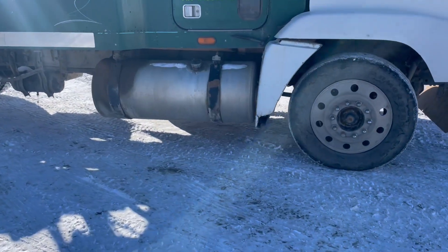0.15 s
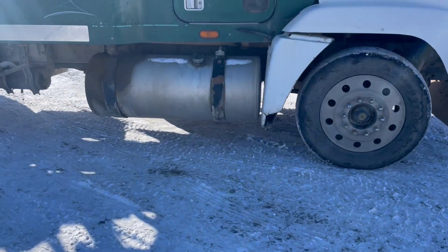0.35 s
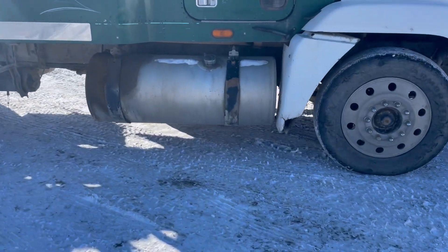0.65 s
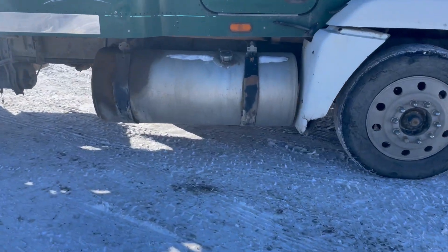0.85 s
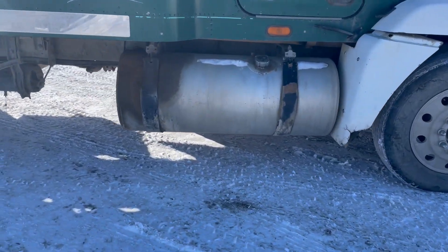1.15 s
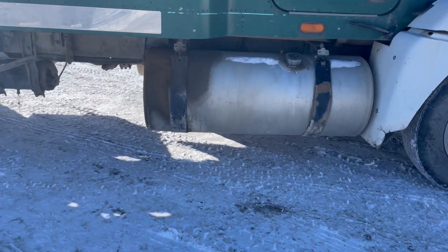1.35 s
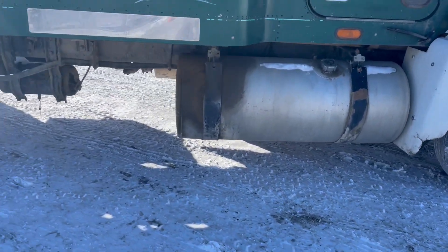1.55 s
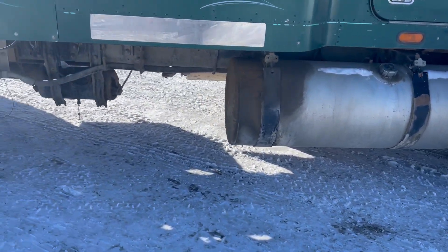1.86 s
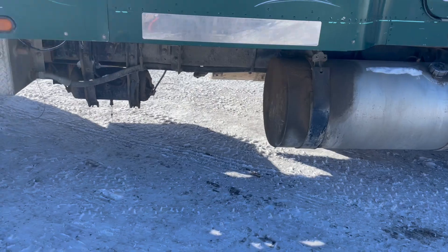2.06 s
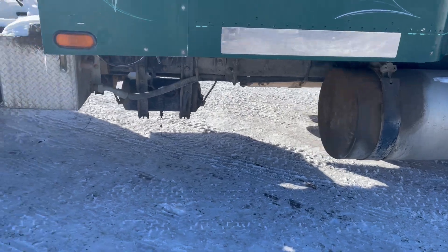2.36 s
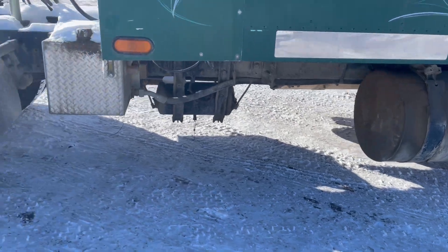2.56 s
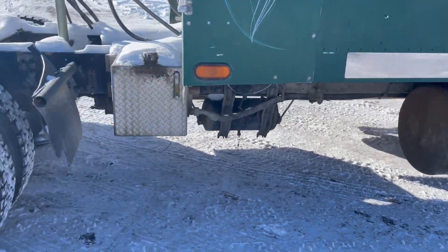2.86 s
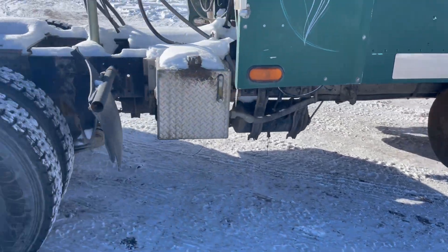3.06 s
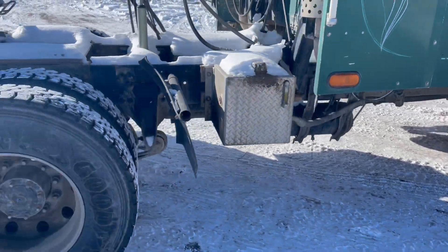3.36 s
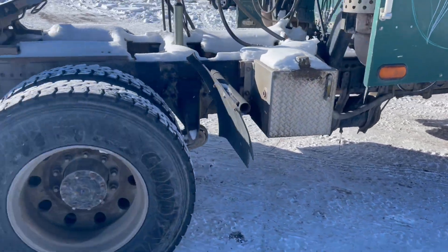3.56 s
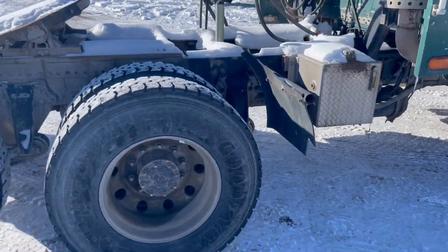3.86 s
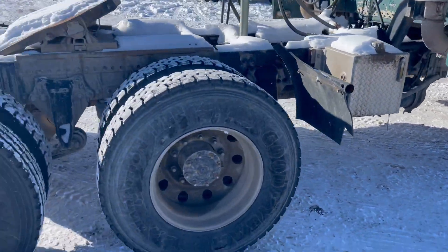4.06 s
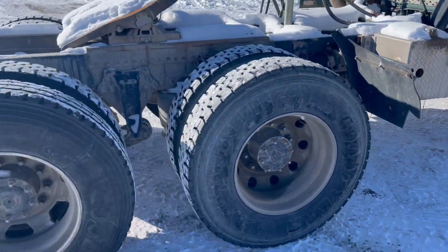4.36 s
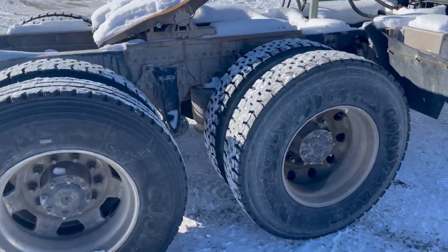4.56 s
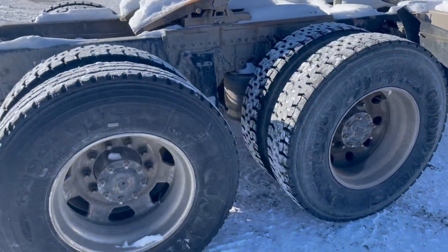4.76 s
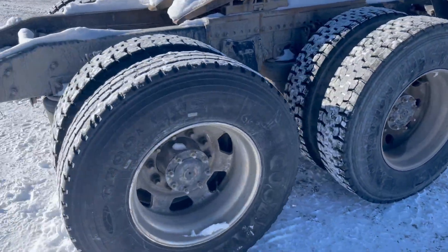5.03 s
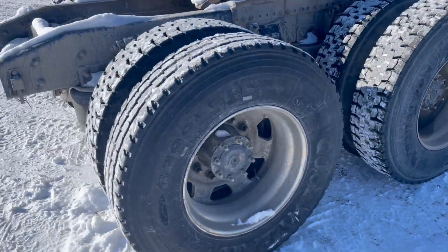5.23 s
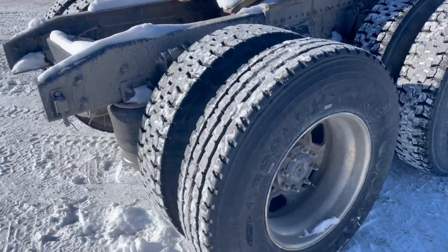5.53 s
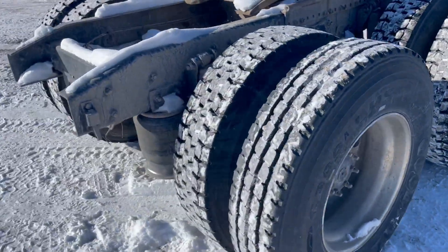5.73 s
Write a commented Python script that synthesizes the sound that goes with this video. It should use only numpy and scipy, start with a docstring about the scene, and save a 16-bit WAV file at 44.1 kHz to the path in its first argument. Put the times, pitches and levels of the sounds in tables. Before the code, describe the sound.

A large diesel truck in an open snowy yard, heard close from a hand-held stereo microphone moving along its side. A short rev with knocking and small metal ticks falls to a lumpy idle, where a thin gear whine and a descending turbo whistle come forward. Then two hard revs follow almost without a gap, with droning exhaust and dense metallic clatter. Wind thumps the microphone throughout.

```python
"""A six-cylinder diesel truck in a snowy open yard, heard by a hand-held two-port microphone walking along it.
First a blip: firing-gated noise roars and knocks, short metallic rings sound, turbo tones start a long slide down.
Then it coasts to idle: the gear whine, a tone tied to the firing rate, comes forward and the turbo dies out.
Last come two pulls, with hardly a drop between: exhaust orders drone amid a dense run of metallic rings.
Wind buffets the ports throughout: rumble and flutter of filtered noise, and eddies as short falling sines."""
import sys
import numpy as np
from scipy import signal
from scipy.fft import rfft, irfft
from scipy.io import wavfile
from scipy.ndimage import uniform_filter1d, map_coordinates

SR = 44100
rng = np.random.default_rng(int(sys.argv[2]) if len(sys.argv) > 2 else 0)


def log_audio(samples):
    """Write samples as a 16-bit WAV file to the path given in sys.argv[1]."""
    # one column per channel
    frames = np.atleast_2d(samples).T
    # limit to full scale, then quantise
    limited = np.clip(frames, -1, 1)
    pcm = np.round(limited * 32767).astype(np.int16)
    wavfile.write(sys.argv[1], SR, pcm)


def ratio(d):
    """dB to gain"""
    e = np.asarray(d, float) / 20
    return 10 ** e


N = 259749
HZ = np.arange(N // 2 + 1) * SR / N + 1e-3   # frequency of every spectrum bin


def in_time(rows):
    """Columns of a time table, interpolated at every sample."""
    s, *columns = np.transpose(rows)
    return [np.interp(np.arange(N) / SR, s, c) for c in columns]


def at_hz(points):
    """A spectrum table at every bin, interpolated over log frequency."""
    hz, value = np.transpose(points)
    return np.interp(np.log(HZ), np.log(hz + 1), value)


def rms_one(x):
    """Scaled to unit power."""
    return x / np.sqrt(np.mean(x ** 2) + 1e-20)


def drift(rate_hz):
    """Random wander of spread 1: noise rolled off above rate_hz."""
    return rms_one(irfft(rfft(rng.standard_normal(N)) / (1 + (HZ / rate_hz) ** 2), N))


def coloured(source, gain):
    """Filtered by a gain per bin, then scaled to unit power."""
    return rms_one(irfft(rfft(source) * gain, N))


def tone(hz, waver_db):
    """A sine of rms 1 on a pitch curve, its level then wavering by waver_db."""
    cycles = np.cumsum(hz) / SR + rng.random()
    return np.sqrt(2) * np.sin(2 * np.pi * cycles) * ratio(waver_db * drift(9))


def shared_only(x):
    """Rows are the part common to both ports and the diffuse part; here the diffuse part is silent."""
    return np.array([x, np.zeros(N)])


# engine speed through blip, coast to idle and two pulls: (time [s], firing rate [1/s])
SPEED = [(0, 44.44), (.28, 40.29), (.56, 46.18), (.7, 47.13), (1.26, 38.18), (1.68, 32.6), (1.77, 31.5),
         (1.9, 32.1), (2.4, 32.22), (3.36, 32.17), (3.5, 32.04), (3.64, 32.47), (3.78, 35.0), (3.92, 37.5),
         (4.18, 41.8), (4.35, 49.14), (4.45, 53.3), (4.66, 66.17), (4.74, 69.4), (4.8, 73.3), (4.97, 71.96),
         (5.2, 74.25), (5.29, 74.7), (5.5, 66.1), (5.89, 62)]


def firing_rate():
    """Firings per second at every sample."""
    return in_time(SPEED)[0]


# strength of each of the six cylinders in turn: (level [dB])
CYLINDER_DB = [3.5, -3, -2.5, 2.5, -3, -2]


def firing_noise(per_s, depth, scatter_db, repeat=0., spread_s=0.024):
    """Each firing swells the noise in the walls, stronger in some cylinders; spread_s is the 1/e decay."""
    turns = np.cumsum(per_s) / SR + .3
    firing = turns.astype(int)
    bump = np.sin(np.pi * (turns - firing) ** 0.7) ** 4      # swells fast, dies slower
    struck = np.diff((turns + .6).astype(int), prepend=0)    # near the top of each swell
    scatter = scatter_db * rng.standard_normal(400)[firing]
    strength = ratio(np.array(CYLINDER_DB)[firing % 6] + scatter)
    noise = rng.standard_normal((2, N)) * (1 + depth * strength * bump)
    # the same parts answer every firing alike, which draws faint lines at the firing rate
    answer = rng.standard_normal((2, 2048)) * np.exp(-np.arange(2048) / (spread_s * SR))
    alike = irfft(rfft(struck * strength) * rfft(answer, N), N)
    return rms_one(noise) + repeat * rms_one(alike)


# block noise as load rises and the listener walks: (time [s], body [dB], knock [dB], hiss [dB])
LOAD = [(0, -34.5, -39.5, -51.5), (.27, -33.5, -38, -51), (.32, -27, -37, -46), (.44, -24.5, -33.5, -41.5),
        (.6, -24.5, -34, -45.5), (.66, -32.5, -36.5, -47.5), (1.65, -32.5, -42.5, -52.5),
        (1.8, -28.5, -40.5, -52), (2.47, -30.5, -42, -52), (3.3, -28.5, -41.5, -53.5),
        (3.6, -30.5, -40, -54), (3.71, -26.5, -36, -50), (3.75, -24, -30.5, -44.5), (3.92, -24.5, -34, -47),
        (3.97, -31, -34, -51), (4.17, -25.5, -30, -50.5), (4.218, -22, -25, -36.5),
        (4.42, -18.5, -24.5, -33), (4.65, -19.5, -23, -30.5), (4.818, -22.5, -24, -36),
        (4.87, -28, -29.5, -44.5), (5.02, -29, -33, -38), (5.1, -22, -31, -40.5), (5.24, -29.5, -28.5, -45),
        (5.32, -31.5, -30.5, -38), (5.7, -30, -31, -39), (5.88, -27, -30, -39)]
# load at which each layer's offset holds: (body [dB], knock [dB], hiss [dB])
LOUD_DB = -26, -32, -43
FLICKER_HZ = 18


def layer_db(mix):
    """Level of one layer: its shares of the load curves, a flicker of its own and the walk."""
    offset_db, *shares, flicker_db, walk_db_per_s = mix
    load_db = sum(share * (db - loud) for share, db, loud in zip(shares, in_time(LOAD), LOUD_DB))
    flicker = flicker_db * drift(FLICKER_HZ)
    return offset_db + load_db + flicker - walk_db_per_s * np.arange(N) / SR


# the upper edge of the airy treble sinks in the loud pulls: (time [s], edge [Hz])
TREBLE_EDGE = [(0, 13700), (3.9, 13280), (4.2, 11700), (4.9, 11400), (5.2, 11800), (5.5, 12300),
               (5.88, 12400)]
TREBLE_EDGE_DB, TREBLE_EDGE_HZ = -12, 300   # loss above the edge, width over which it sets in


def edge_dulled(x):
    """Narrow slices of the treble drop once the edge has sunk below them."""
    edge_hz, = in_time(TREBLE_EDGE)
    spectrum = rfft(x)
    out = x
    for low in np.arange(11400, 13900, 300):
        part = irfft(spectrum * ((HZ >= low) & (HZ < low + 300)), N)
        depth = np.clip((low - edge_hz) / TREBLE_EDGE_HZ + 1, 0, 1)
        out = out + part * (ratio(TREBLE_EDGE_DB * depth) - 1)
    return out


# colour of each layer of the block: (frequency [Hz], relative level per Hz [dB])
ROAR = [(150, -21), (250, -5.5), (280, -6), (311, -15.5), (340, 0.5), (368, -6), (425, -0.5), (475, -3),
        (515, -0.5), (550, -3), (595, 0.5), (650, -2), (760, -6), (854, -4), (898, -6), (950, -5),
        (1240, -22.5), (2090, -120)]
RATTLE = [(530, -25), (900, -7.5), (962, -10.5), (1040, 2), (1270, -2), (1370, -6), (1490, -1),
          (1610, -6.5), (1750, -5.5), (2280, -18), (3850, -120)]
KNOCK = [(1000, -2.5), (1700, -3.5), (2420, -1.5), (2980, -3.5), (3470, -7.5), (3930, -8.5), (4500, -13),
         (5850, -59), (9900, -120)]
HISS = [(3500, -26), (4300, 1), (5000, 4), (6000, -1), (7000, -1), (7550, 1), (8300, -6), (9000, -11),
        (9800, -41)]
AIR = [(8300, -4), (8900, 6.5), (10500, 0.5), (12000, -4.5), (13200, 0), (15600, 0), (16200, -50)]
# layer mixes: (offset [dB], body share, knock share, hiss share, flicker [dB], loss on the walk [dB/s])
ROAR_MIX = (2, 1.06, 0., 0., 1.35, 0.02)
RATTLE_MIX = (-1.5, 0.53, 0.17, 0.026, 0.67, 0.2)
KNOCK_MIX = (0.14, 0.2, 0.3, 0.48, 0.97, 0.022)
HISS_MIX = (0, 0., 0., 1., 1., 0.)
AIR_MIX = (0.5, 0.19, -0.11, 0.85, 1.6, 1.45)
# the rattle is screened as the listener leaves the engine bay: (time [s], gain [dB])
RATTLE_HEARD = [(0, 2), (1.2, 2.5), (1.8, 0), (3.5, -2.5), (4.5, -3), (5.0, -8.5), (5.88, -7.5)]
# evenness of the firings: (scatter between firings [dB], level of the repeating answer [ratio])
EVEN = 1.2, .6


def block(per_s):
    """The engine walls turn each firing into roar, rattle, knock, hiss and airy treble."""
    body_db, knock_db, hiss_db = LOUD_DB
    roar = coloured(firing_noise(per_s, 0.18, *EVEN, spread_s=0.23), ratio(at_hz(ROAR)))
    rattle = coloured(firing_noise(per_s, 0.17, *EVEN, spread_s=0.031), ratio(at_hz(RATTLE)))
    knock = coloured(firing_noise(per_s, 0.026, *EVEN, spread_s=0.33), ratio(at_hz(KNOCK)))
    hiss = coloured(firing_noise(per_s, 0.35, EVEN[0]), ratio(at_hz(HISS)))
    air = edge_dulled(coloured(firing_noise(per_s, 0.61, EVEN[0]), ratio(at_hz(AIR))))
    out = ratio(body_db + layer_db(ROAR_MIX)) * roar
    out += ratio(body_db + layer_db(RATTLE_MIX) + in_time(RATTLE_HEARD)[0]) * rattle
    out += ratio(knock_db + layer_db(KNOCK_MIX)) * knock
    out += ratio(hiss_db + layer_db(HISS_MIX)) * hiss
    return out + ratio(hiss_db + layer_db(AIR_MIX)) * air


# bouts in which one panel changes level: (start [s], length [s], panel [index from 0], gain [dB])
BOUTS = [(0.31, 0.32, 2, 7.5), (3.733, 0.058, 2, 16), (3.79, 0.14, 2, 8.5), (4.7, 0.08, 2, 7),
         (5.45, 0.296, 3, 2.5), (3.766, 0.255, 0, 7), (4.4, 0.08, 0, 5), (4.55, 0.128, 1, 4.5),
         (4.5, .36, 3, -3), (4.754, 0.125, 0, 4.5), (5.074, 0.116, 1, 14), (5.203, 0.079, 0, 9.5),
         (5.3, 0.53, 1, 6), (4.92, 0.93, 3, 7.5), (4.6, .4, 3, 8.5), (4.8, 0.68, 1, 1.5), (6.5, 0.6, 0, 1)]
BOUT_EDGE_S = 0.015


def bouts_db(panel):
    """Gain of one panel, held for the length of each of its bouts."""
    t = np.arange(N) / SR
    gain_db = 0
    for s, length, k, db in BOUTS:
        if round(k) == panel:
            inside_s = np.minimum(t - s, s + length - t)
            gain_db = gain_db + db * np.clip(inside_s / BOUT_EDGE_S + .5, 0, 1)
    return gain_db


PANEL_WANDER, WANDER_HZ = .013, 4.0   # pitch spread as a share, rate


def wandering(x):
    """Read at an unsteady pace, so that every resonance slides up and down."""
    at = np.cumsum(1 + PANEL_WANDER * drift(WANDER_HZ))
    at = np.clip(at - np.linspace(0, at[-1] - N, N), 0, N - 1)
    return np.array([map_coordinates(row, [at], order=2) for row in x])


# resonances of four wall panels, one list each: (frequency [Hz], width [Hz], relative level [dB])
WALL_MODES = [
    [(1950, 100, -4.5), (2130, 130, -6.5)],
    [(2650, 140, -22), (2650, 500, -16)],
    [(3380, 710, 6), (3630, 110, 1)],
    [(1009, 20, 7.5), (1100.5, 22, 4), (1302, 41, 0.5), (1500, 50, -9)],
]
# one mix per panel: (offset [dB], body share, knock share, hiss share, flicker [dB], loss on the walk [dB/s])
PANEL_MIX = [(-6, 0., 1.16, 0., 1.9, 0.63), (-15.5, 0., 1.5, 0.5, 2.5, 0.072),
             (-15.5, 0.0041, 0.51, 0.41, 2.6, 0.67), (-22.5, 0.014, 0.31, 0.076, 3.3, -1.9)]


def panels(per_s):
    """Firings excite the resonances of four panels, which ring out in bouts."""
    out = np.zeros((2, N))
    for k, (modes, mix) in enumerate(zip(WALL_MODES, PANEL_MIX)):
        gain = sum(ratio(db) / (1 + (2 * (HZ - hz) / width_hz) ** 2) ** 1.14 for hz, width_hz, db in modes)
        ring = coloured(firing_noise(per_s, 1.0, 1.5, repeat=.8, spread_s=.008), gain)
        out += ratio(LOUD_DB[1] + layer_db(mix) + bouts_db(k)) * wandering(ring)
    return out


# metallic knocks, and three brief swells of the gear side tone near 590 Hz:
# (time [s], ring level [dB], ring pitch [Hz])
RINGS = [(0.2859, -44, 3240), (0.2933, -40, 3120), (0.3078, -39, 3480), (0.3323, -30, 3380),
         (0.3607, -30, 3470), (0.3911, -30, 3610), (0.4131, -35, 3450), (0.426, -37, 3660),
         (0.448, -35, 3380), (0.4739, -39, 3420), (0.4964, -43, 3340), (0.5238, -34, 3470),
         (0.5333, -34, 3310), (0.5438, -30, 3310), (0.5592, -29, 3650), (0.6026, -27, 3250),
         (2.153, -17.5, 588), (2.34, -22.5, 600), (3.42, -23, 600), (3.738, -33, 3600), (3.768, -28, 3450),
         (4.4503, -30, 1500), (4.5027, -26, 1440), (4.5511, -23, 1460), (4.59, -20, 1460),
         (4.6344, -27, 1430), (4.6539, -30, 1530), (4.7104, -22, 1513), (4.7492, -18, 1500),
         (4.7701, -18, 1480), (4.2187, -20.5, 2570), (4.2432, -28, 2620), (4.2622, -20, 2350),
         (4.2876, -25, 2670), (4.3076, -22, 2640), (4.327, -19, 2640), (4.347, -15, 2610),
         (4.3679, -11.5, 2630), (4.4078, -10.5, 2700), (4.4268, -10, 2660), (4.4632, -21, 2650),
         (4.4927, -25, 2570), (4.5381, -29, 2500), (4.552, -22, 2740), (4.5879, -19, 2810),
         (4.6014, -22, 2530), (4.6193, -12, 2650), (4.6477, -12, 2675), (4.7221, -16, 2800),
         (4.7353, -17.5, 2650), (4.7621, -19.5, 2530), (4.8065, -15, 2700), (4.826, -16, 2200),
         (4.832, -19, 2600), (4.1978, -30, 1950), (4.2128, -32, 2060), (4.237, -14.5, 1904),
         (4.3385, -25, 1920), (4.3565, -16, 1930), (4.3773, -13, 1950), (4.4318, -21, 2140),
         (4.4697, -22, 2090), (4.5221, -22, 2070), (4.6239, -15, 1915), (4.6932, -25, 1900),
         (4.7386, -32, 1980), (4.7531, -21, 1950), (4.7705, -19, 2000), (4.8104, -20, 1950),
         (4.8394, -16, 2030), (5.0344, -28, 1860), (5.0658, -27, 2150), (5.0857, -19, 2040),
         (5.1262, -24, 2220), (5.1481, -20, 2070), (5.1606, -22, 2040), (5.1745, -21, 2140),
         (5.191, -25, 2060), (5.215, -20.5, 1890), (5.2299, -18, 1970), (5.2514, -23, 2130),
         (5.2833, -25, 2130)]
RING_RISE_S, RING_CYCLES = 0.00073, 122   # cycles until 60 dB down
RING_GRIT, RING_DIFFUSE = 0.34, 0.63      # roughness of the common part, level of the diffuse part
CRACK_DB, CRACK_S, CRACK_ABOVE_HZ = -11, .004, 3800   # level for a 3500 Hz ring, 1/e decay, low limit


def short_rings():
    """Each is a crack and a short gritty ring; part of it arrives scattered by the chassis."""
    out = np.zeros((2, N + SR))
    t = np.arange(SR // 10) / SR
    white = rng.standard_normal((len(RINGS), 2, len(t)))
    grit = uniform_filter1d(white, size=20) * np.sqrt(20)
    high_pass = signal.butter(2, CRACK_ABOVE_HZ, "high", fs=SR, output="sos")
    cracks = signal.sosfilt(high_pass, white) * np.exp(-t / CRACK_S)
    for (s, db, hz), rough, crack in zip(RINGS, grit, cracks):
        shape = np.tanh(t / RING_RISE_S) ** 2 * ratio(-60 * t * hz / RING_CYCLES)
        swing = [1 + RING_GRIT * rough[0], RING_DIFFUSE * rough[1]]
        ring = shape / shape.max() * swing * np.sin(2 * np.pi * hz * t)
        # higher rings open with a much stronger crack
        snap = ratio(CRACK_DB) * (3500 / hz) ** -4 * uniform_filter1d(crack, size=4)
        out[:, round(s * SR):][:, :len(t)] += ratio(db) * (ring + snap)
    return out[:, :N]


# exhaust drone, set by the fuel burnt: (time [s], first order ahead of the stack [dB])
DRONE = [(.2, -53), (.36, -34.5), (.55, -34), (.8, -34), (.95, -67), (3.55, -62), (3.72, -21), (3.9, -20),
         (4.18, -19.5), (4.45, -14), (4.66, -9), (4.8, -11), (4.97, -30.5), (5.05, -12.5), (5.2, -17),
         (5.3, -21), (5.4, -36), (5.55, -60)]
# firing orders one to four: (level [dB])
ORDERS_DB = [0, -2, -6, -4.5]
# what the stack passes: (frequency [Hz], gain [dB])
PIPE = [(30, -2.5), (76, -2.5), (90, -25), (135, -28), (148, 2), (165, 3), (215, -2), (235, -14),
        (300, -34)]
# upper orders: (multiple of the firing rate)
UPPER_ORDERS = [5, 5.5, 8.4, 8, 9.9]
PIPE_HZ, PIPE_WIDTH_HZ, PIPE_DB = 380, 80, -13   # upper resonance: centre, width, level


def exhaust(per_s):
    """Orders of the firing rate swell and sink as they cross the resonances of the stack."""
    drone_db, = in_time(DRONE)
    low = upper = 0
    for k, db in enumerate(ORDERS_DB, 1):
        stack_db = np.interp(k * per_s, *np.transpose(PIPE))
        low = low + ratio(db + stack_db) * tone(k * per_s, waver_db=0.8)
    for k in UPPER_ORDERS:
        off_centre = 2 * (k * per_s - PIPE_HZ) / PIPE_WIDTH_HZ
        upper = upper + tone(k * per_s, waver_db=5.0) / (1 + off_centre ** 2)
    return ratio(drone_db) * (low + ratio(PIPE_DB) * upper)


# gear whine, loudest while coasting: (time [s], whine [dB], side tones ahead of the casing [dB])
WHINE = [(0, -39, -38), (.26, -43, -38), (.32, -44, -43), (.62, -43, -42), (.7, -31, -38), (.79, -32, -38),
         (.85, -40, -38), (1.06, -43, -39), (1.09, -27, -35), (1.2, -30, -36), (1.28, -25, -39),
         (1.33, -27, -41), (1.38, -37, -45), (1.64, -38, -52), (1.72, -29, -51), (1.84, -27, -51),
         (1.95, -31, -52), (2.13, -33, -52), (2.25, -39, -50), (2.75, -40, -52), (2.83, -30, -53),
         (2.95, -32, -53), (3.1, -41, -53), (3.18, -34, -54), (3.27, -39, -54), (3.37, -34, -54),
         (3.43, -50, -52), (3.53, -48, -52), (3.6, -36, -50), (3.7, -46, -48), (4.06, -35, -45),
         (4.17, -29, -44), (4.3, -60, -60), (4.65, -48, -50), (4.8, -36, -40), (5.0, -41, -37),
         (5.1, -42, -44), (5.25, -40, -46), (5.4, -60, -60)]
# side tones: (multiple of the whine)
GEAR_PARTS = [1 / 3, 2 / 3, 4 / 3, 2]
# what the gear casing passes of the side tones: (frequency [Hz], gain [dB])
CASING = [(300, 0), (360, 3), (420, 1), (480, -4), (600, -7), (700, -14), (790, 2), (900, -14), (1300, -8),
          (1400, -22), (1500, 3), (1560, -5), (1640, -10), (1750, -22), (2100, -22), (2200, -6), (2290, -6),
          (2380, -5), (2500, -6), (2600, -2), (2800, -30), (3200, -50)]
WHINE_PER_FIRING = 27.5   # whine cycles per firing


def gear(per_s):
    """Meshing teeth whine in step with the engine; the casing colours their side tones."""
    whine_db, side_db = in_time(WHINE)
    hz = WHINE_PER_FIRING * per_s * (1 + .0018 * drift(20) * per_s / 32)
    side = 0
    for k in GEAR_PARTS:
        casing_db = np.interp(k * hz, *np.transpose(CASING))
        side = side + ratio(casing_db) * tone(k * hz * (1 + 0.00607 * drift(42)), waver_db=2.0)
    return ratio(whine_db) * tone(hz, waver_db=1.6) + ratio(side_db) * side


# turbo shaft winding down: (time [s], shaft tone [Hz])
TURBO = [(0, 3945), (.3, 3741), (.9, 3535), (2.1, 2894), (2.4, 2763), (3.0, 2538), (3.3, 2465), (3.6, 2433),
         (4.0, 2420)]
# whistles: (multiple of the shaft tone)
TURBO_PARTS = [2, 3, 4, 5]
# level of each whistle at the start, ahead of the gain below: (level [dB])
TURBO_PARTS_DB = [-58, -63, -66, -73]
# steady change of each whistle: (fade [dB/s], negative grows)
TURBO_FADE_DB_PER_S = [3.5, 2.5, 0, -.5]
# the whistles hide under the blip and die out at idle: (time [s], gain [dB])
TURBO_HEARD = [(0, 2), (.3, 1), (.4, -3), (.7, -3), (.76, 7), (1.2, 2.5), (2.3, 1.5), (2.9, 1.5),
               (3.7, -25)]
# narrow intake hiss: (time [s], level [dB], centre [Hz])
INTAKE = [(2.6, -66, 7500), (2.95, -49, 7500), (3.5, -54, 7460), (3.9, -51, 7500), (4.2, -52, 7600),
          (4.5, -66, 7600), (5.1, -66, 7300), (5.4, -54, 7600), (5.6, -54, 7950), (5.88, -52, 8150)]
INTAKE_WIDTH_HZ = 400   # to either side of the centre


def turbo():
    """Thin unsteady whistles that die out as the shaft slows, leaving a narrow hiss."""
    t = np.arange(N) / SR
    hz = in_time(TURBO)[0] * (1 + .002 * drift(60))
    hiss_db, hiss_hz = in_time(INTAKE)
    hiss = drift(INTAKE_WIDTH_HZ) * tone(hiss_hz, waver_db=2.5)
    whistles = 0
    for k, db, fade_db in zip(TURBO_PARTS, TURBO_PARTS_DB, TURBO_FADE_DB_PER_S):
        whistles = whistles + ratio(db - fade_db * t) * tone(k * hz, waver_db=1.5)
    return ratio(hiss_db) * hiss + ratio(in_time(TURBO_HEARD)[0]) * whistles


# gusts, ahead of their random swell: (time [s], rumble [dB], flutter [dB])
WIND = [(0, -25.5, -30), (.2, -28.5, -32.5), (.39, -20, -33), (.57, -10, -20), (.62, -20.5, -29),
        (.93, -24.5, -27), (1.29, -34.5, -35.5), (1.45, -25, -30), (1.9, -36, -34.5), (2.2, -26, -29.5),
        (2.55, -27, -25), (3.0, -24.5, -31), (3.5, -28.5, -27.5), (3.72, -23.5, -21), (4.09, -29, -25),
        (4.27, -26, -23), (4.7, -23.5, -19.5), (4.98, -20.5, -20.5), (5.06, -21.5, -15), (5.3, -22, -21),
        (5.44, -29, -20.5), (5.65, -20.5, -20), (5.75, -10.5, -12.5), (5.88, -18, -14)]
# colour of rumble and flutter: (frequency [Hz], relative level per Hz [dB])
WIND_COLOUR = [(12, -50), (25, -30), (33, -22), (42, -3.5), (59, 2.5), (75, -0.5), (107, -4.5), (125, -6),
               (160, -53), (280, -120)]
FLUTTER = [(80, -3), (130, 3.5), (170, 5.5), (220, -4.5), (300, -6), (420, -9), (700, -58)]
# eddies bursting on the ports: (time [s], level [dB], starting pitch [Hz], length [s])
EDDIES = [(0.108, -9.5, 190, 0.013), (0.118, -16.5, 407, 0.012), (0.373, -13, 108, 0.054),
          (0.54, -11.5, 303, 0.0079), (0.556, -8, 283, 0.031), (0.708, -10.5, 174, 0.012),
          (0.886, -23, 263, 0.041), (1.543, -17, 267, 0.018), (1.561, -14.5, 242, 0.019),
          (1.598, -21, 382, 0.019), (2.229, -16, 99, 0.021), (2.413, -12, 132, 0.0095),
          (2.783, -26, 108, 0.027), (3.374, -10, 178, 0.015), (5.473, -8, 188, 0.013),
          (5.716, -4.5, 605, 0.01), (5.725, -6, 171, 0.032), (5.777, -16, 110, 0.02),
          (5.825, -9.5, 562, 0.02), (5.838, -5.5, 115, 0.033), (5.87, -4, 258, 0.023)]
GUST_DB, GUST_HZ = 2, 3.4   # spread and rate of the random swell


def wind():
    """Turbulence at the ports: lumpy rumble, a faster flutter, and eddies whose pitch drops as they pass."""
    rumble_db, flutter_db = (db + GUST_DB * drift(GUST_HZ) for db in in_time(WIND))
    rumble = coloured(rng.standard_normal((2, N)) * ratio(3 * drift(18)), ratio(at_hz(WIND_COLOUR)))
    flutter = coloured(rng.standard_normal((2, N)) * ratio(3 * drift(30)), ratio(at_hz(FLUTTER)))
    thumps = np.zeros(N + SR)
    t = np.arange(SR // 10) / SR
    for s, db, hz, length in EDDIES:
        cycles = hz * .03 * (1 - np.exp(-t / .03))   # pitch falls to 1/e in 0.03 s
        shape = np.tanh(t / 0.0024) * np.exp(-(t / length) ** 4)
        thumps[round(s * SR):][:len(t)] += ratio(db) * np.sin(2 * np.pi * cycles) * shape
    return ratio(rumble_db) * rumble + ratio(flutter_db) * flutter + shared_only(thumps[:N])


# phase between the ports: (frequency [Hz], lead of the left [rad])
PORT_PHASE = [(20, 0), (1290, -.7), (1550, -1.2), (2150, -.9), (2900, .7), (4310, -.1), (5170, .6),
              (6000, 0), (6800, -1.2), (7670, -3.11), (8900, -3.17), (9130, -4.2), (10200, -5.1),
              (10800, -6.2), (12700, -6.4), (13300, -7.6), (14000, -9.3), (16000, -9.45)]
# balance of the ports: (frequency [Hz], left minus right [dB])
PORT_BALANCE = [(60, -0.5), (110, -0.5), (200, -1.5), (360, -1), (660, -3.5), (1200, -3), (2180, 2.5),
                (3960, 4.5), (6500, 2.5), (7600, 0), (8900, 0), (10000, 0), (13100, 0)]
# likeness of the ports: (frequency [Hz], likeness [0-1])
LIKENESS = [(60, .93), (300, .93), (600, .85), (1300, .78), (2800, .78), (5000, .82), (6000, .92),
            (7700, .999), (8900, .999), (9500, .97), (13000, .97), (14000, .995)]


def ports(parts):
    """The two ports hear the common part with a phase and level offset, the diffuse part in opposition."""
    common, diffuse = rfft(parts)
    alike = np.clip(at_hz(LIKENESS), 0, 1)
    sign = np.array([[1], [-1]])   # left, right
    pair = np.sqrt((1 + alike) / 2) * common + sign * np.sqrt((1 - alike) / 2) * diffuse
    balance = ratio(sign * at_hz(PORT_BALANCE) / 2)
    return irfft(pair * balance * np.exp(.5j * sign * at_hz(PORT_PHASE)), N)


def scene():
    """Truck and wind at the two ports."""
    per_s = firing_rate()
    tones = exhaust(per_s) + gear(per_s) + turbo()
    return ports(block(per_s) + panels(per_s) + short_rings() + shared_only(tones) + wind())


def roll_off(x):
    """The treble ends steeply here."""
    return signal.sosfilt(signal.butter(12, 15800, fs=SR, output="sos"), x)


# top of the treble, trimmed after the peaks are rounded: (frequency [Hz], gain [dB])
TOP_TRIM = [(20, 0), (12200, 0), (12600, -7), (20000, -6)]


def record(dry):
    """The peaks are rounded, then the treble top is trimmed."""
    rounded = 1.25 * np.tanh(dry / 1.43)
    mix = irfft(rfft(rounded) * ratio(at_hz(TOP_TRIM)), N)
    return roll_off(mix)


dry = scene()
out = record(dry)
log_audio(out)
```